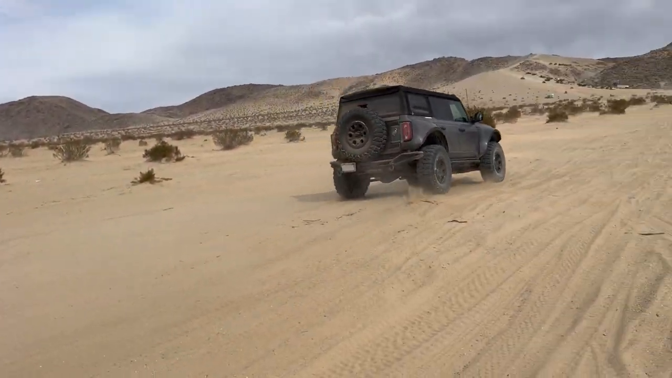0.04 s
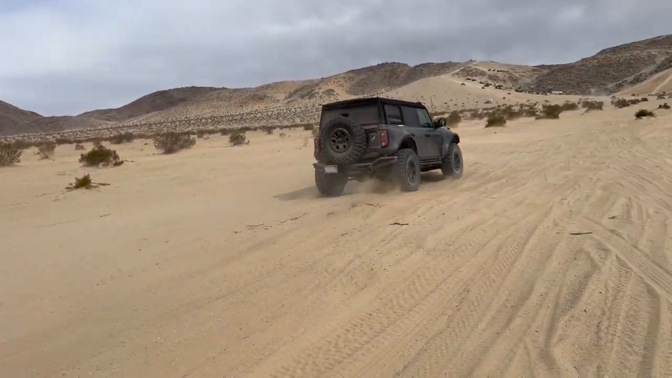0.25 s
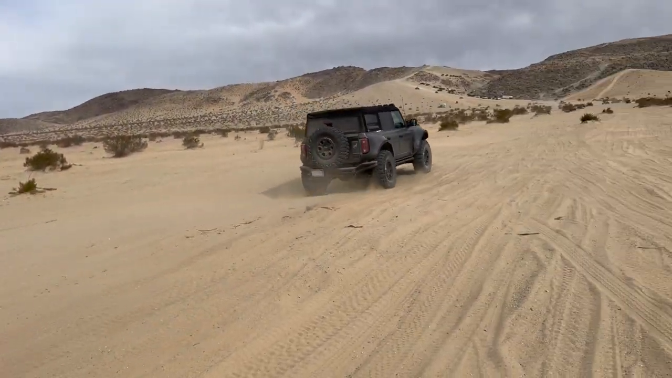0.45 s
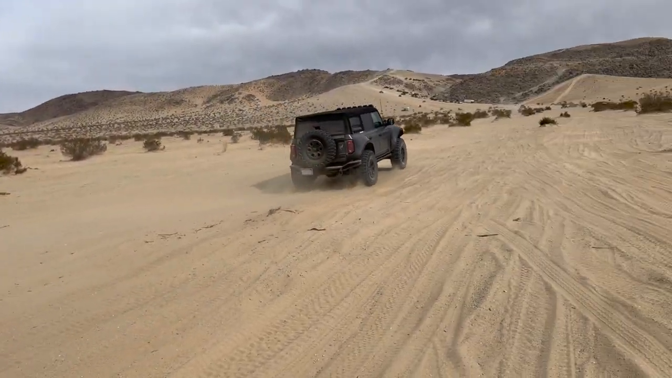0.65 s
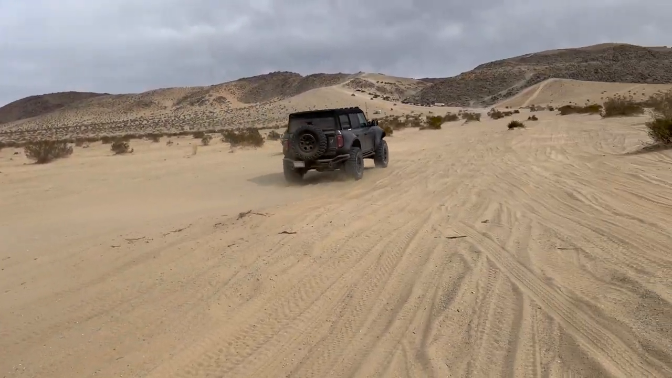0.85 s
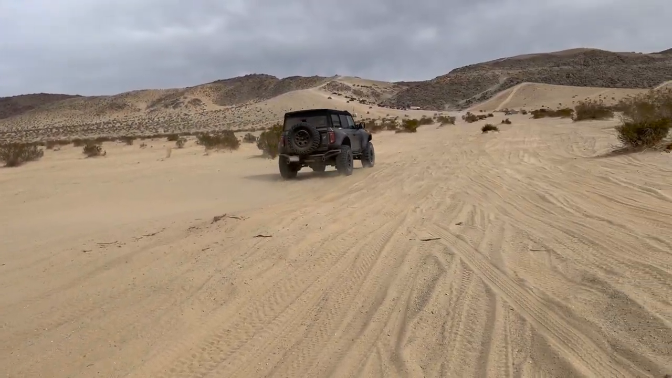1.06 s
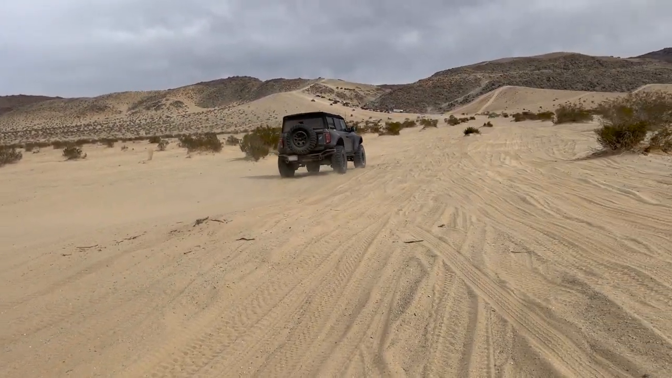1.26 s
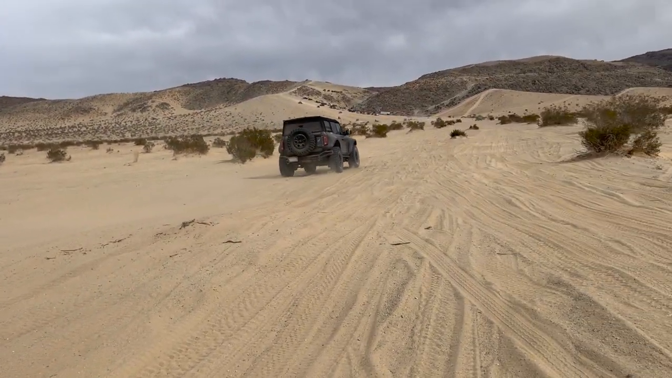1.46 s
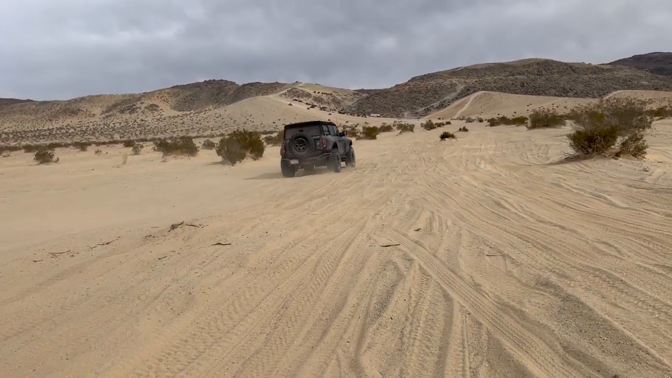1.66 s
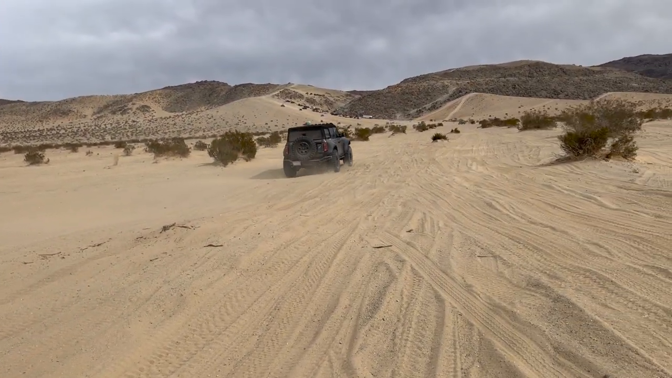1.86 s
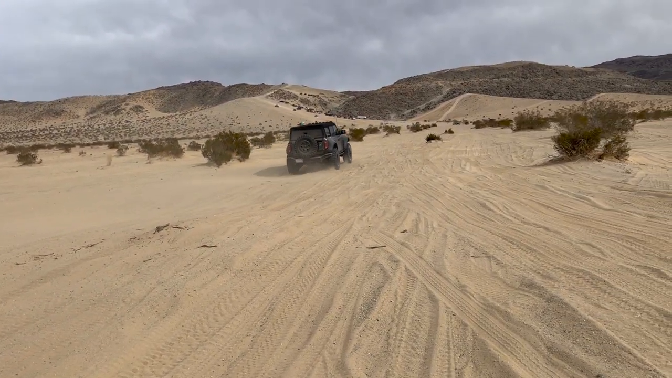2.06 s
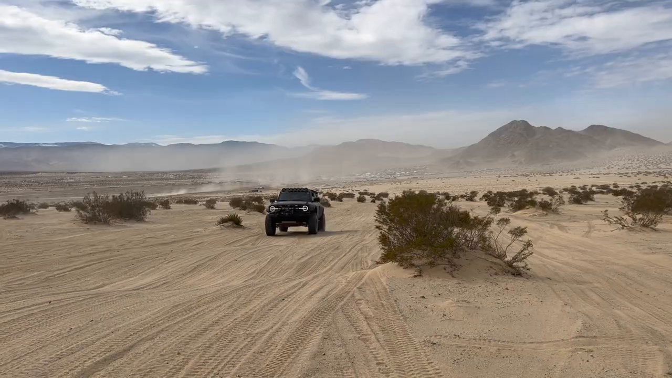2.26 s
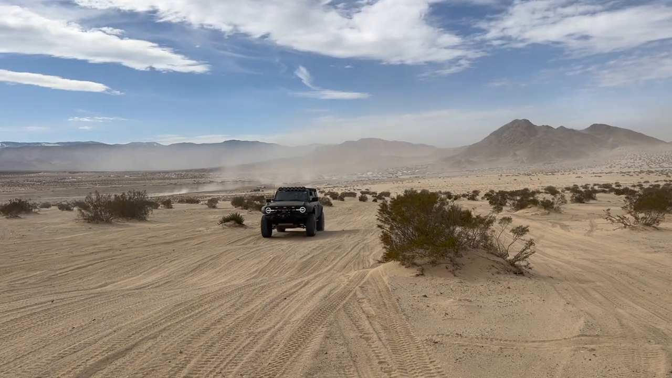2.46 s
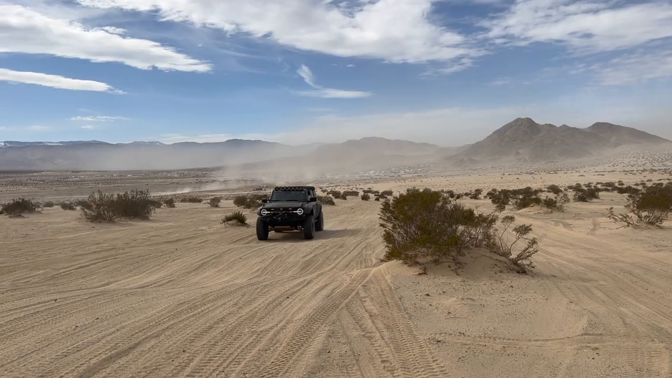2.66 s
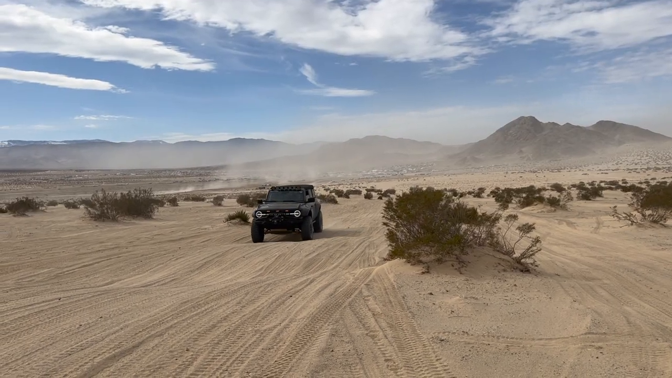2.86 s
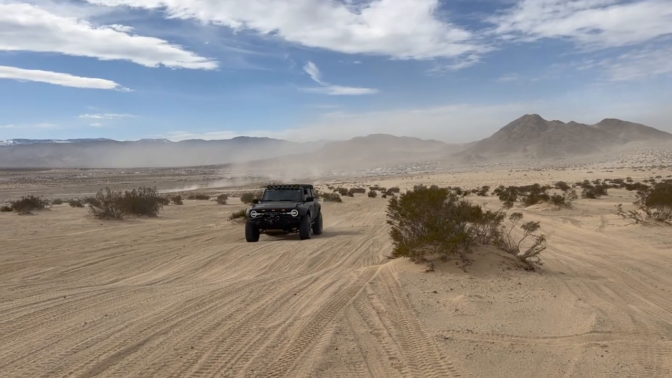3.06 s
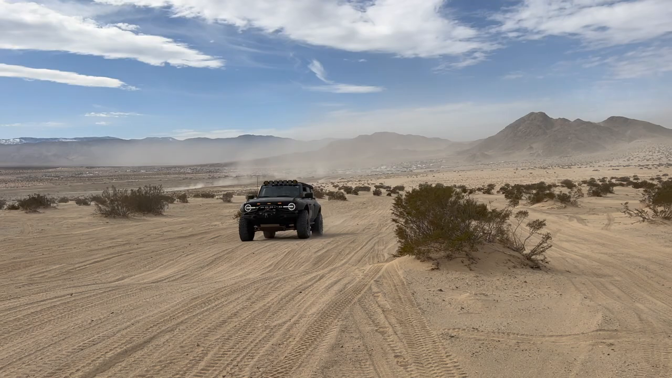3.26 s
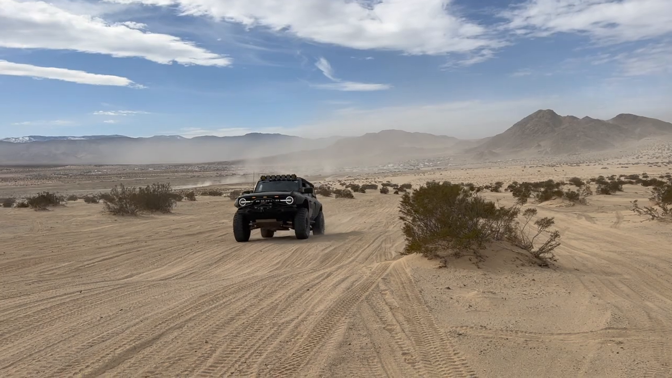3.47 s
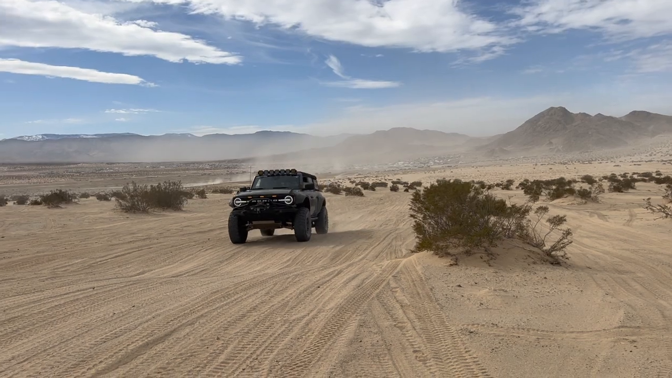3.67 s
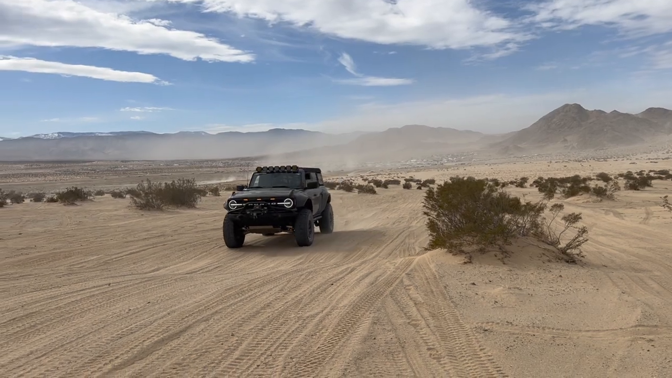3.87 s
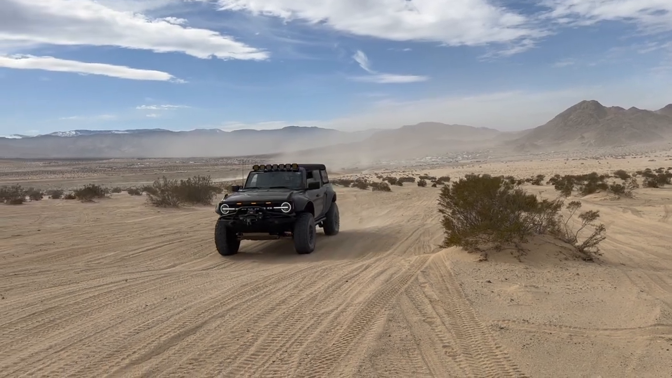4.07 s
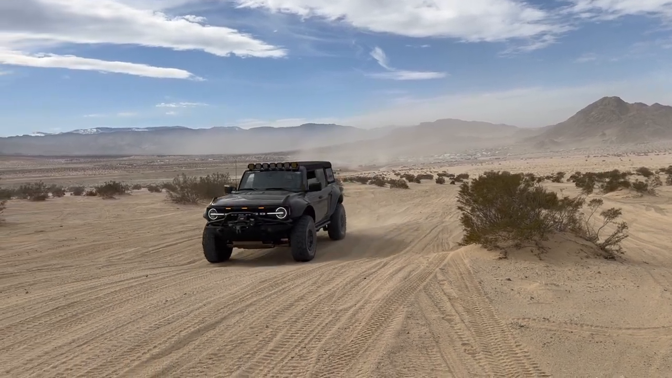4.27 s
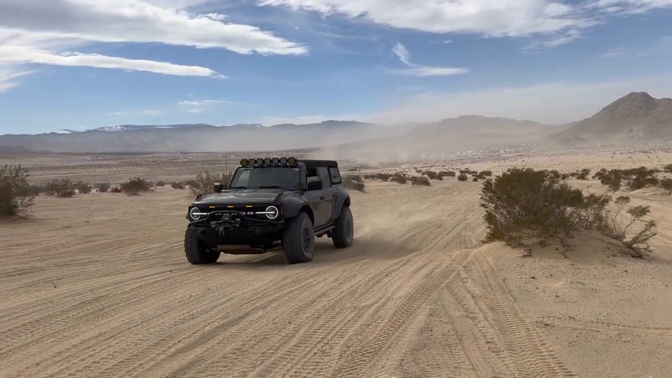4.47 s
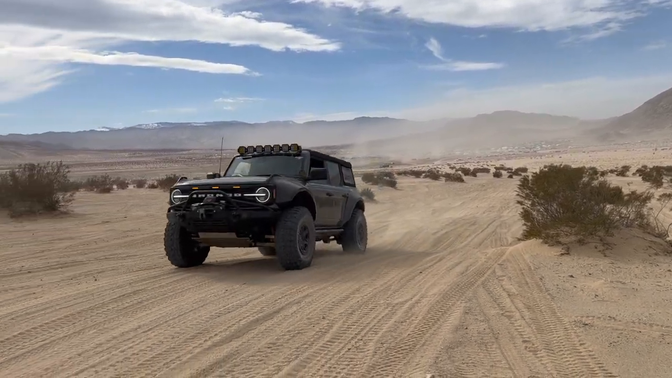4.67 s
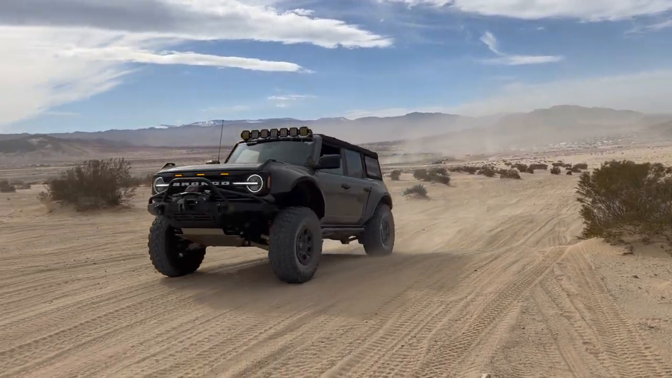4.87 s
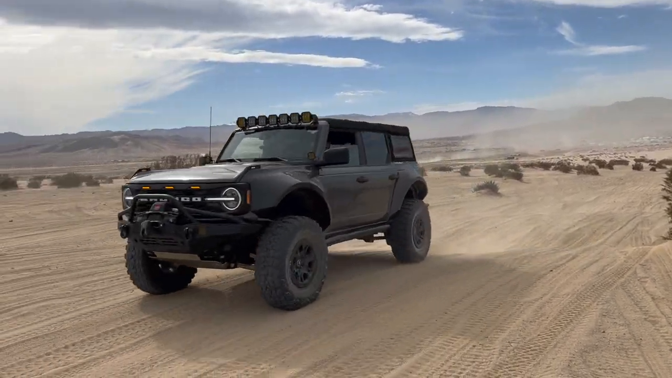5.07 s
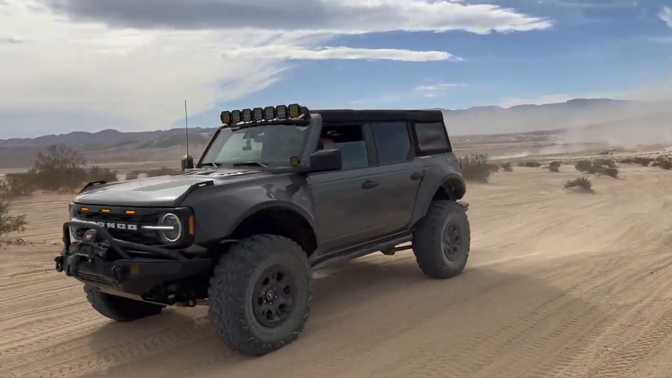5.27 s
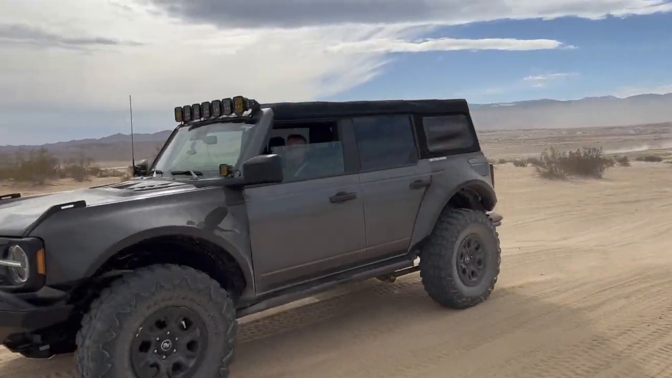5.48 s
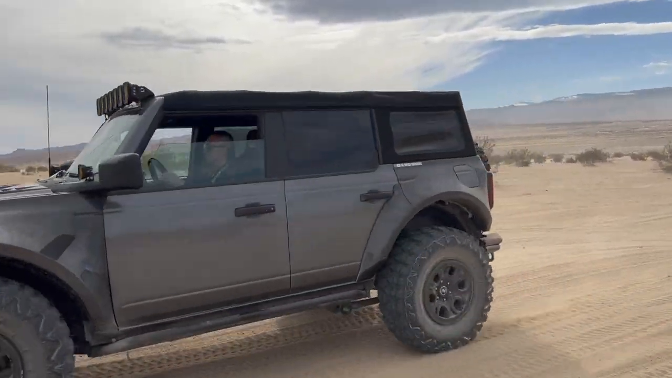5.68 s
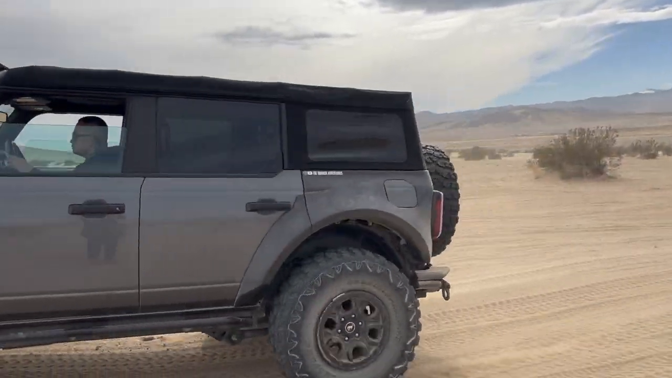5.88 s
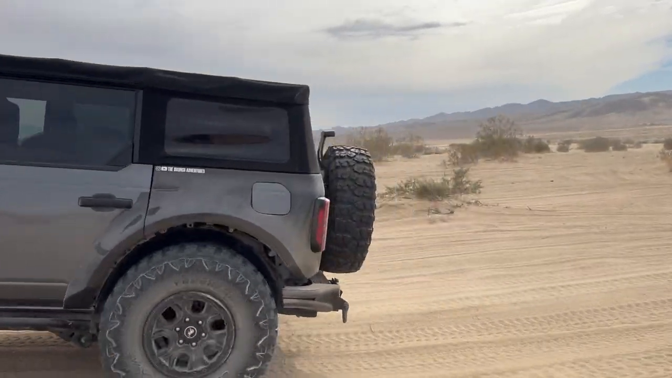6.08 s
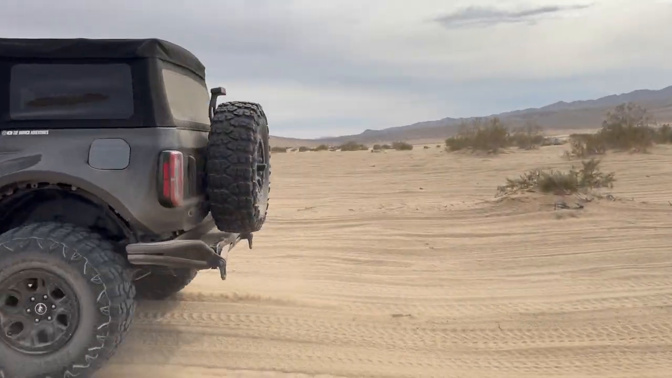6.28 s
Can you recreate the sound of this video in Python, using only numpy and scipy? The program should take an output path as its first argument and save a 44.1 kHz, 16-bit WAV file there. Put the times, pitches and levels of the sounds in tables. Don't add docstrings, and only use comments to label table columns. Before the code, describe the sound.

An off-road vehicle growls away through deep sand, bogging down, then abruptly a second pass approaches, swells loudly and sweeps by with gritty tyre spray.

```python
import sys
import numpy as np
from scipy import signal
from scipy.fft import rfft, irfft, next_fast_len
from scipy.io import wavfile
from scipy.ndimage import uniform_filter1d

SR = 44100
rng = np.random.default_rng(int(sys.argv[2]) if len(sys.argv) > 2 else 0)


def volts_from_decibels(level):
    exponent = np.asarray(level, float) / 20
    return 10 ** exponent


def put_to_file(sound):
    columns = np.atleast_2d(sound).T
    safe = np.clip(columns, -1, 1)
    whole_steps = np.round(safe * 32767)
    wavfile.write(sys.argv[1], SR, whole_steps.astype(np.int16))


N = 279153
T = np.arange(N) / SR
CHANGE_S = 2.2168
AFTER = np.clip((T - CHANGE_S) / .002, 0, 1)


def by_scene(leaving, passing):
    return (1 - AFTER) * leaving + AFTER * passing


def columns(*spans):
    parts = []
    for span in spans:
        time, *values = np.transpose(span)
        parts.append(np.array([np.interp(T, time, value) for value in values]))
    return by_scene(parts[0], parts[-1])


def on_log(hz, table):
    table = np.array(table)
    return np.interp(np.log(hz), np.log(table[:, 0]), table[:, 1])


def unit(x):
    return x / np.sqrt(np.mean(x ** 2))


def band(hz, width):
    edges = np.array([hz - width / 2, hz + width / 2])
    sos = signal.butter(2, edges, "band", fs=SR, output="sos")
    return unit(signal.sosfilt(sos, rng.standard_normal((2, N))))


def walk(rate):
    hold = int(SR / rate)
    steps = np.repeat(rng.standard_normal(N // hold + 1), hold)
    slewed = uniform_filter1d(uniform_filter1d(steps, hold), hold)
    return unit(slewed[:N])


START_M, LEAVE_M_S = 6.94, 3.67
CLOSEST_S, CLOSEST_M, PASS_M_S = 5.71, 2.64, 6.19


def distance():
    leaving = START_M + LEAVE_M_S * T
    passing = np.hypot(PASS_M_S * (T - CLOSEST_S), CLOSEST_M)
    return by_scene(leaving, passing)


# (time [s], firing rate [Hz], order 1 level [dB])
LEAVING_FIRING = [(0, 71.2, -24), (.4, 68.77, -19.5), (.61, 69.4, -22.5), (.72, 71.9, -15.5),
                  (1.24, 75.3, -15), (1.4, 73.06, -17), (1.54, 71.4, -22.5), (2.2, 61.4, -27)]
# (time [s], firing rate [Hz], order 1 level [dB])
PASSING_FIRING = [(2.23, 95.3, -15.5), (2.43, 92.7, -14.5), (2.6, 82.4, -17), (2.97, 85.7, -15),
                  (3.5, 80.76, -15), (3.88, 84.4, -18), (4.15, 91.3, -10.5), (4.4, 86.84, -11),
                  (4.75, 92.67, -9), (5.0, 87.72, -9), (5.35, 83.27, -9), (5.73, 70.8, -7.5),
                  (6.02, 75.75, -6.5), (6.33, 68.5, -10)]


def firing():
    return columns(LEAVING_FIRING, PASSING_FIRING)


FULL_LOAD_DB = -6


def load():
    return firing()[1] + 20 * np.log10(distance() / 3) - FULL_LOAD_DB


# (level at 3 m leaving [dB], level at 3 m passing [dB], loss leaving [dB/m],
# loss passing [dB/m], gain with load [dB/dB])
NOISE_LAW = [
    (-23.5, -27, 0.6, 0.087, 0.66),
    (-39.5, -36, 0.65, 0.3, 0.46),
    (-59, -46.5, -0.42, 0.02, 0.57),
    (-47, -61, 2.75, .02, 0.48),
]


def noise_levels():
    leaving_db, passing_db, leaving_loss, passing_loss, load_gain = np.array(NOISE_LAW).T[:, :, None]
    metres = distance()
    near = by_scene(leaving_db - leaving_loss * metres, passing_db - passing_loss * metres)
    return near - 20 * np.log10(metres / 3) + load_gain * load()


NOISE_ANCHORS = [400, 1500, 4500, 11000]
# (frequency [Hz], density against the ruling layer [dB per Hz])
ROAR_COLOUR = [(30, -34), (50, -8), (120, -8.5), (250, -18.5), (500, -26), (1000, -28), (1400, -33.5),
               (2100, -28.5), (3100, -34), (4200, -28.5), (5500, -33), (7500, -31.5), (9000, -29),
               (12000, -18.5), (15500, -44)]
LEAVING_RUMBLE_DB = -9.5


def roar(turn):
    out, levels, lurch = 0, noise_levels(), walk(22)
    for hz in 32 * 2 ** (np.arange(28) / 3):
        share = [np.interp(np.log(hz), np.log(NOISE_ANCHORS), row) for row in np.eye(4)]
        db = np.dot(share, levels) + on_log(hz, ROAR_COLOUR)
        db = db + 10 * np.log10(hz / 6.57)
        db = db + LEAVING_RUMBLE_DB * (1 - AFTER) * (hz < 55)
        db = db + .9 * min(hz / 3000, 1) * lurch + 1.2 * walk(9)
        puff = 1 + .2 * min(1500 / hz, 1) * np.cos(turn + .7)
        out = out + volts_from_decibels(db) * puff * band(hz, hz / 4.19)
    return out


def swell(rows):
    gain = 0
    for peak_s, peak_db, rise, fall in rows:
        slope = np.where(T < peak_s, rise, fall)
        own_scene = AFTER if peak_s > CHANGE_S else 1 - AFTER
        gain = gain + volts_from_decibels(peak_db - slope * np.abs(T - peak_s)) * own_scene
    return gain


SWELLS = {(3820., 110.): [(3.2, -63, 3, 19), (4.25, -52, 48, 37), (4.9, -59.5, 19, 11)],
          (4400., 2000.): [(1.07, -64, 76, 23.5), (1.3, -62.5, 14.5, 92), (5.33, -41.5, 29.5, 16.5),
          (6.3, -54, 81, 50)], (2450., 900.): [(2.5, -57, -4.5, 10.5), (3.62, -55.5, 34, 67),
          (5.8, -45, 19, 30), (6.17, -40.5, 48.5, 161), (6.33, -40.5, 126.5, 50)],
          (5200., 300.): [(2.3, -67, 47, 13), (4.6, -64, 3.5, 58)], (1700., 200.): [(3.4, -68, -7, 8.5),
          (5.3, -42, 17.5, 9)], (1050., 1100.): [(.02, -51.5, 51.5, 69.5), (1.25, -55, 41, 29),
          (4.92, -36.5, 45, 19.5)], (400., 330.): [(.02, -40, 50, 63.5), (4.0, -36.5, 17.5, 38.5),
          (5.3, -30, 17.5, 3.5)], (175., 70.): [(1.7, -34.5, 36, 39), (2.05, -36.5, 30, 23),
          (5.4, -21.5, 27.5, 35)]}
SWELLS[(9500., 8000.)] = [(1.2, -68, 25, 25), (5.45, -54, 20, 20)]


def resonant_swells():
    out = 0
    for (hz, width), rows in SWELLS.items():
        out = out + swell(rows) * volts_from_decibels(1.3 * walk(18)) * band(hz, width)
    return out


def inside(table):
    fade_in = (T - table[0][0]) / .02 + 1
    fade_out = (table[-1][0] - T) / 0.073
    return np.clip(np.minimum(fade_in, fade_out), 0, 1)


# (time [s], frequency [Hz], level [dB])
WHISTLES = [
    [(2.23, 8600, -66), (2.4, 8630, -54), (2.5, 8400, -64.5), (2.62, 7870, -69), (2.75, 7600, -79)],
]


def turbo_whistle():
    out = 0
    for table in WHISTLES:
        hz, db = columns(table)
        level = inside(table) * volts_from_decibels(db + 4.0 * walk(60))
        out = out + level * np.sin(2 * np.pi * np.cumsum(hz + 25 * walk(90)) / SR)
    return out


# (frequency [Hz], density [dB per Hz])
GRIT_COLOUR = [(2400, -2), (3600, 4.5), (5500, -14), (8000, -6.5)]
# (time [s], peak level [dB], treble [dB], thud [dB], length [s])
SCUFFS = [(0.0374, -40.5, -19.5, 0, 0.046), (0.1896, -36, -18, -11.5, 0.018),
          (0.511, -46.5, -14, -5, 0.027), (0.731, -42.5, -22.5, 1, 0.033), (0.776, -42, -22, -2, 0.032),
          (0.849, -42.5, -19, 1, 0.028), (1.49, -50, -23.5, 2.5, 0.026), (1.686, -45, -17.5, -12, 0.02),
          (1.8019, -46.5, -18, -5.5, 0.02), (1.9342, -52.5, -19.5, -3, 0.045),
          (3.595, -41.5, -28.5, 0, 0.021), (4.8853, -38.5, -18.5, 7.5, 0.024),
          (4.961, -38, -10.5, -8.5, 0.024), (5.394, -29, -19, -0.5, 0.027), (5.565, -31, -14.5, -1, 0.034),
          (5.672, -34, -23.5, -9, 0.024), (5.712, -31, -11, 1.5, 0.018), (5.79, -27.5, -22, -5, 0.024),
          (5.9824, -39, -22, 0, 0.024), (6.0265, -30, -32.5, -7, 0.024), (6.084, -29.5, -26.5, -9, 0.024),
          (6.1628, -29.5, -27, 4.5, 0.01), (6.262, -35.5, -17.5, -12, 0.031), (6.291, -30, -21, -5, 0.022)]
GRIT_DB, TREBLE_DB, THUD_DB = -10, -1.5, -2


def scuffs():
    grit = unit(sum(volts_from_decibels(db) * np.sqrt(hz) * band(hz, hz * 0.57) for hz, db in GRIT_COLOUR))
    colours = np.array([grit, band(12000., 7000.), band(1450., 1600.0)])
    envelopes = np.zeros((3, 1, N))
    for start, db, treble_db, thud_db, length in SCUFFS:
        age = np.maximum(T - start, 0)
        shape = np.minimum(age / .004, 1) / (1 + (age / max(length, .003)) ** 2.5)
        parts_db = db + np.array([GRIT_DB, treble_db + TREBLE_DB, thud_db + THUD_DB])
        envelopes += volts_from_decibels(parts_db)[:, None, None] * shape
    return volts_from_decibels(1.1 * walk(250)) * np.sum(envelopes * colours, axis=0)


# (from [s], to [s], edge [s])
LABOURS = [
    (-1, .65, .05),
    (1.5, 2.215, .1),
    (5.05, 5.5, .12),
]
SMOOTH, LUMPY = .9, 1.9


def unevenness():
    labouring = 0
    for start, end, edge in LABOURS:
        release = min(edge, .1)
        corners = [start - edge, start + edge, end - release, end + release]
        labouring = labouring + np.interp(T, corners, [0, 1, 1, 0])
    return SMOOTH + (LUMPY - SMOOTH) * labouring * (1 - AFTER * (T < 3))


# (time [s], level change [dB])
STUMBLES = [(.12, -0.5), (.4, -4.5), (.46, -3.5), (1.01, -4.5), (1.51, -2), (1.83, -7.5), (1.97, -15),
            (2.09, 1.5), (2.191, 0.5), (2.53, 4.5), (3.4, -5.5), (3.8, -1.5), (4.72, -4), (5.14, -5),
            (5.199, -5.5), (5.27, -6), (5.39, -2.5), (5.582, -3)]
STUMBLE_S = 0.026


def stumbles():
    return sum(db * np.exp(-((T - s) / STUMBLE_S) ** 2) for s, db in STUMBLES)


# (order 2, 3, 4, 5 against order 1 [dB])
ORDERS_DB = [
    (-4.5, -20, -35, -48),
    (-14, -18, -19.5, -28.5),
    (-7.5, -22.5, -34, -37),
]
ORDER_LOAD = (-0, -0.7, -1.1, -0.9)
ORDER_LUMP_DB = (-3.5, -7, -4.5, -1)
TAIL_TURNS_S = (4.55, 5.72)


def orders():
    leaving, ahead, alongside = np.array(ORDERS_DB)[:, :, None]
    turned = np.interp(T, TAIL_TURNS_S, [0, 1])
    view_db = by_scene(leaving, ahead + turned * (alongside - ahead))
    load_db = np.outer(ORDER_LOAD, load())
    lump_db = np.outer(ORDER_LUMP_DB, unevenness() - SMOOTH)
    return firing()[1] + view_db + load_db + lump_db


ORDER_PER_HZ = (-0.28, -0.058, -0.095, -0.2)
STUMBLE_UPPER = 1.3


def exhaust():
    hz, first_db = firing()
    upper, rough, slip_db = orders(), unevenness(), stumbles()
    turn = 2 * np.pi * np.cumsum(hz) / SR + .042 * rough * walk(40)
    usual_hz = np.where(T < CHANGE_S, 70, 84)
    upper = upper + STUMBLE_UPPER * slip_db + np.outer(ORDER_PER_HZ, hz - usual_hz)
    levels = [first_db + slip_db, *upper, upper[3] - 6.0, upper[3] - 7.5]
    tone = 0
    for k, db in enumerate(levels):
        wobble_db = (.6 + .22 * k) * rough * walk(28)
        tone = tone + volts_from_decibels(db + wobble_db) * np.cos((k + 1) * turn - .6 * k)
    weak_pair = 0.027 * rough * np.cos(turn / 2)
    throb = .22 * np.clip(rough - .7, 0, 2) * np.cos(turn / 4 + 1.2 * walk(7))
    return np.sqrt(2) * tone * (1 + weak_pair + throb), turn


# (frequency [Hz], left lead [turns], likeness [0-1], left minus right [dB])
PORTS_LEAVING = [(0, 0, .98, -.4), (600, .06, .97, 1), (1100, .05, .87, 4), (1500, -.03, .85, -1),
                 (2100, .15, .85, -6), (2500, .45, .8, -3), (3300, .6, .75, -1), (3900, .9, .6, 0),
                 (4500, 1.1, .87, 2), (5300, 1.2, .6, 8), (5800, 1.3, .3, 5), (6500, 1.05, .55, 6),
                 (7200, 1, .65, 3)]
PORTS_AHEAD = [(0, 0, .98, -.4), (600, .08, .97, 1), (1100, .07, .87, 3), (1700, .08, .8, -4),
               (2300, .35, .7, -4), (2900, 1.2, .7, -1), (3500, 1.4, .7, 0), (3800, 1.85, .8, 0),
               (4500, 1.7, .55, 0), (5200, 2.35, .55, 5), (5800, 1.9, .35, 0), (6300, 2.15, .45, 0),
               (7200, 2, .35, 3)]
PORTS_ALONGSIDE = [(0, 0, .98, -.4), (600, .1, .94, 1), (1100, .15, .75, 6), (1600, .28, .4, 0),
                   (2100, .55, .5, -3), (2700, .95, .2, -1), (3500, 1.35, .4, 0), (4000, 1.75, .3, -1),
                   (4600, 1.9, .35, 0), (5200, 2.1, .3, 4), (6000, 2, .2, 4), (6600, 2.05, .3, 2),
                   (7200, 2, .65, 1)]
PORT_TOP = [(8500, -.25, .7, 0), (9700, -.5, 1, 0), (10400, -.5, 1, 0), (11300, -.7, .8, 0),
            (12300, -.85, .76, 0), (12600, -1, 1, 0), (14300, -1, 1, 0), (14700, -1.15, .6, 0),
            (16000, -1.5, .7, 0)]
# (delay [s], strength [0-1], offset [turns])
ECHOES = [
    [(.00115, .42, .175), (.0013, .35, .625)],
    [(.0023, .55, .15), (.0018, .5, .21)],
    [(.0015, .25, .3), (.0011, .25, .6)],
]
ALONGSIDE_S = (4.1, 4.8)


def ports(direct, scattered, blend):
    edge, heard = SR // 20, []
    size = next_fast_len(N + 2 * edge)
    f = np.arange(size // 2 + 1) * SR / size
    padded = np.pad([direct, scattered], ((0, 0), (edge, size - N - edge)), "reflect")
    spectra = rfft(padded)
    for low, echoes in zip((PORTS_LEAVING, PORTS_AHEAD, PORTS_ALONGSIDE), ECHOES):
        top = [(h, low[-1][1] + t, c, p) for h, t, c, p in PORT_TOP]
        hz, *rows = np.transpose(low + top)
        turns, like, pan_db = (np.interp(f, hz, row) for row in rows)
        common, opposed = spectra * np.sqrt([(1 + like) / 2, (1 - like) / 2])
        lead = np.exp(1j * np.pi * turns) * volts_from_decibels(pan_db / 2)
        reach = np.interp(f, [600, 1500, 7500, 9000], [0, 1, 1, 0])
        comb = [np.abs(1 + g * reach * np.exp(2j * np.pi * (f * s + turn))) for s, g, turn in echoes]
        left = (common * comb[0] + opposed) * lead
        right = (common * comb[1] - opposed) / lead
        heard.append(irfft(np.array([left, right]), size)[:, edge:edge + N])
    leaving, ahead, alongside = heard
    swing = np.interp(T, ALONGSIDE_S, [0, 1])
    return by_scene(leaving, (1 - swing) ** blend * ahead + swing ** blend * alongside)


def scene():
    tone, turn = exhaust()
    noise = roar(turn) + resonant_swells() + scuffs()
    noise[0] += turbo_whistle()
    stray = .3 * np.pad(tone, (900, 0), "reflect")[:N] * walk(6)
    out = ports(tone, stray, 1) + ports(*noise, .85)
    out[:, int(CHANGE_S * SR) + 30] += volts_from_decibels(-44)
    fade = np.minimum(np.minimum(T / .002, (T[-1] - T) / .006), 1)
    return out * fade


def low_pass(x):
    return signal.sosfilt(signal.butter(12, 15690, fs=SR, output="sos"), x)


def record(dry):
    x = signal.sosfilt(signal.butter(2, 30, "high", fs=SR, output="sos"), dry)
    x = np.tanh(.8 * x) / .8
    x = signal.sosfilt(signal.ellip(8, .2, 70, 15700, fs=SR, output="sos"), x)
    return low_pass(x)


dry = scene()
out = record(dry)
put_to_file(out)
```